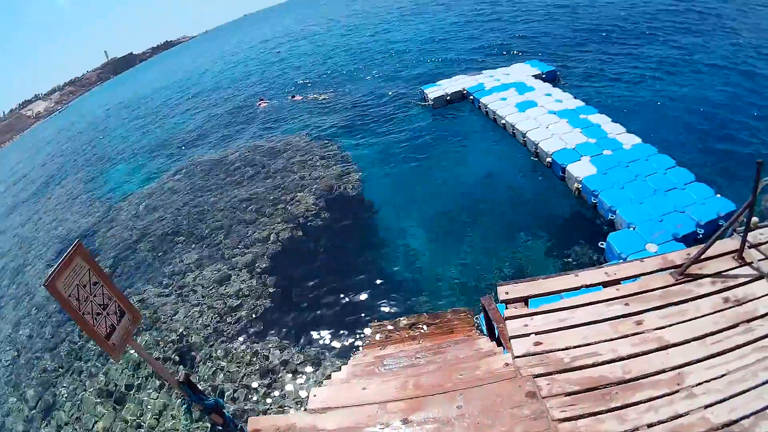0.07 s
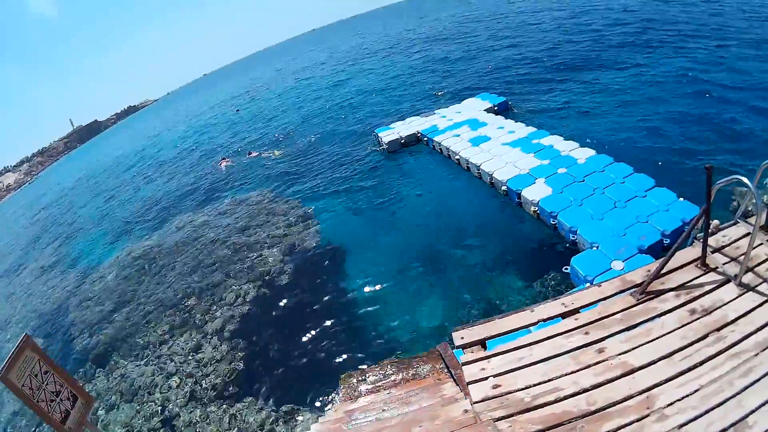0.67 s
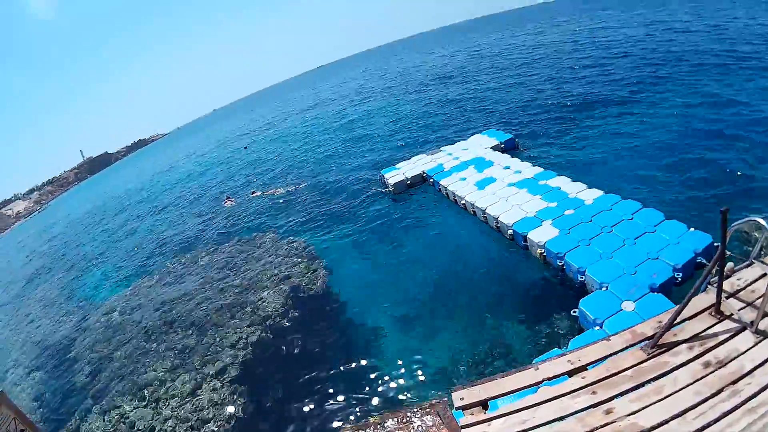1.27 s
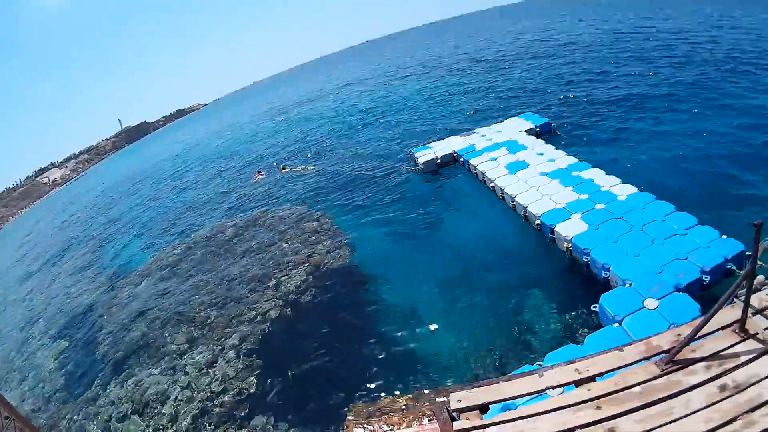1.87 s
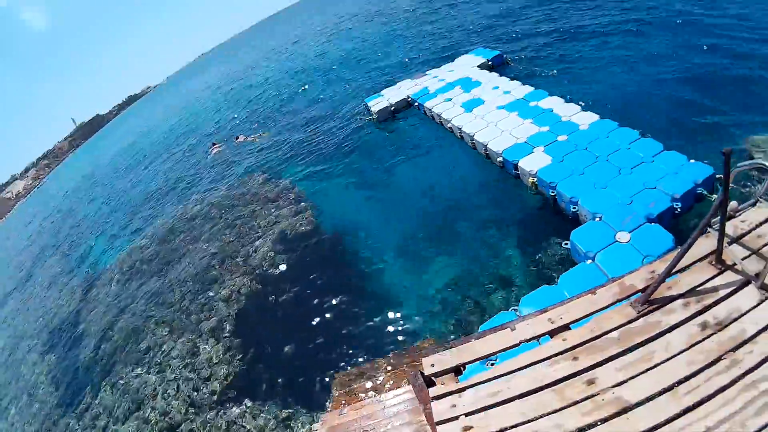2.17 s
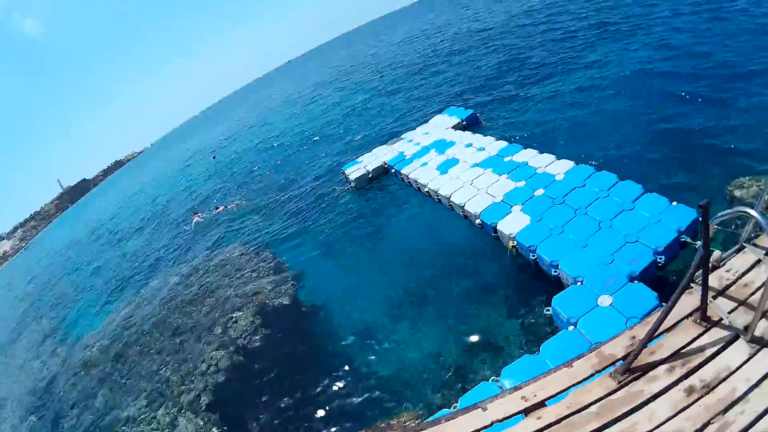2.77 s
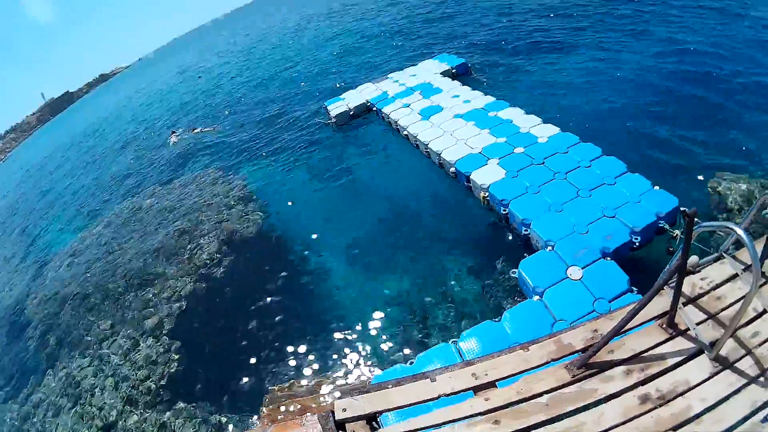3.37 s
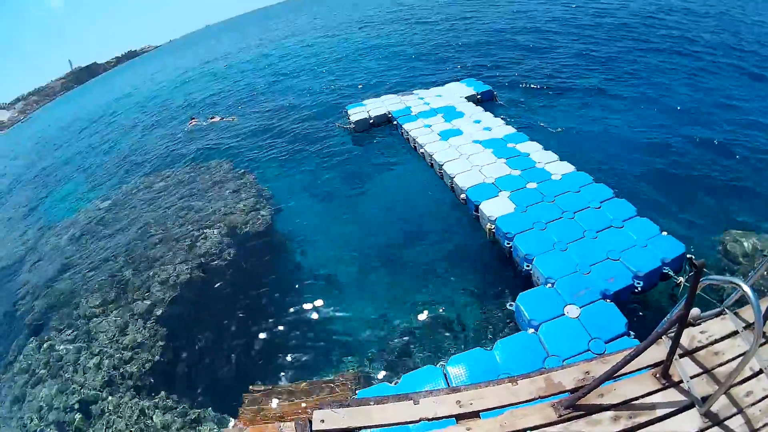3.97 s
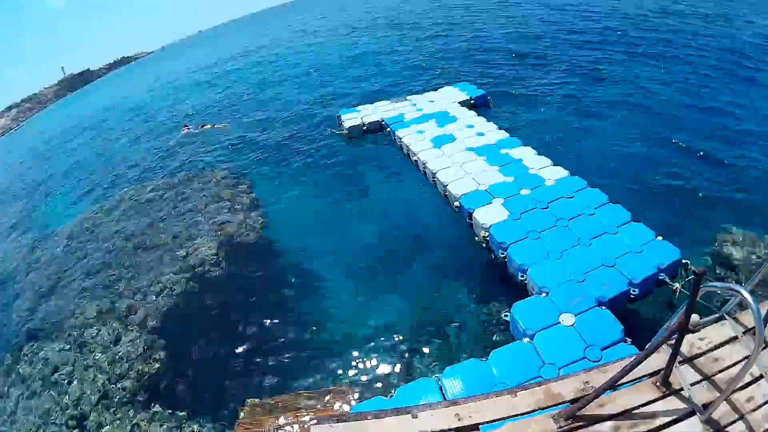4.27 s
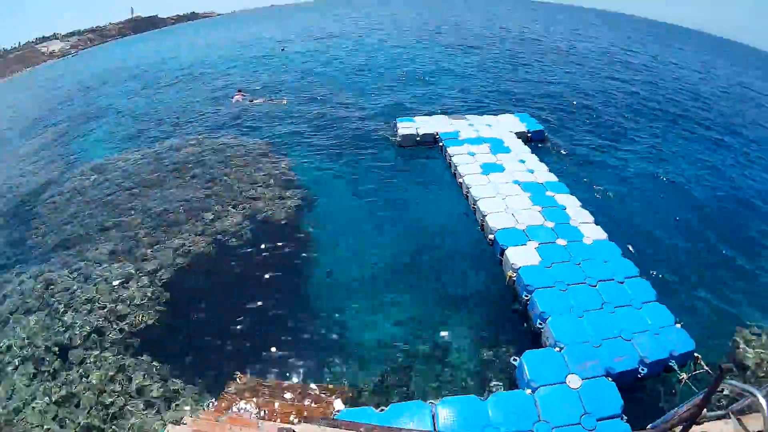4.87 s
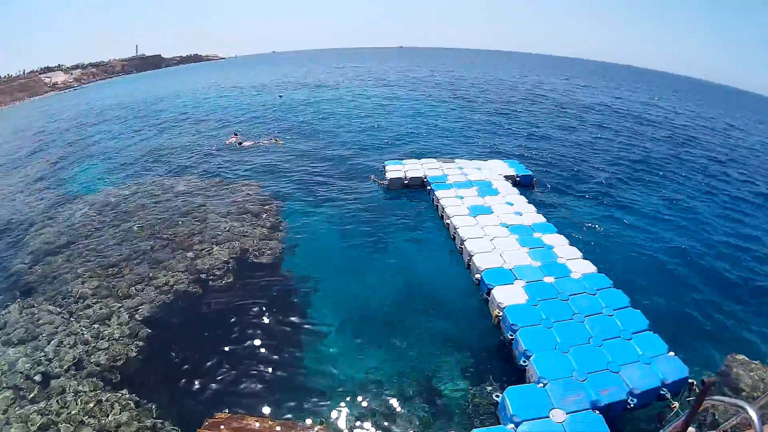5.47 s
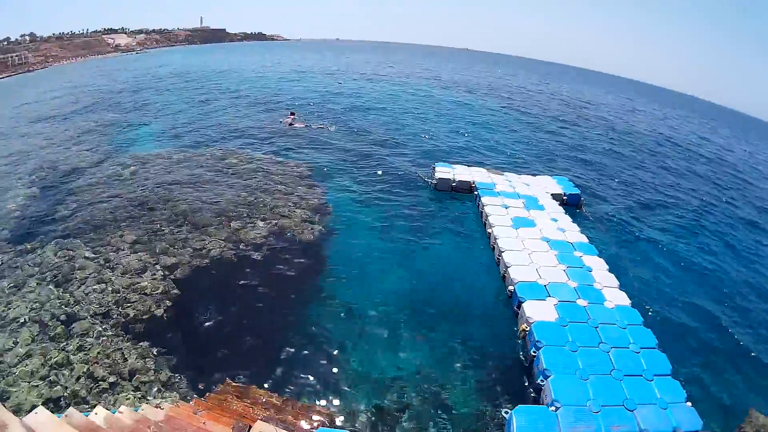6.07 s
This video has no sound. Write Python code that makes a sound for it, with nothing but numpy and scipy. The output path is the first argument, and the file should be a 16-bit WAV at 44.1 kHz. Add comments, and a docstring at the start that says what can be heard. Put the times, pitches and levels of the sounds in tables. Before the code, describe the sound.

Everything is heard from inside a closed plastic case carried along a wooden jetty. A hand rubs on the shell right at the microphone in short groans and hissing strokes, over a faint, muffled sea wash and thin hiss. Soft, dull footfalls land in the first second. Louder clusters of thuds, hollow booms and plastic clacks come at about 1.4 and 1.9 seconds, with a little ringing from the mount. The heaviest step hits at 2.3 seconds with a short, bright ring, followed by a thin rising squeak and a few tiny ticks. Lighter bumps come around 3.2 and 4.3 seconds, with the hand sliding between them. A board gives three faint, low creaks from 4.5 to 4.7 seconds. Another run of hollow knocks lands just after 5 seconds, then hissing rubs and small taps continue until about 6 seconds.

```python
"""A hand rubs on plastic, right at the microphone, and a footfall thuds up from below: someone shuffles
along the planks of a seaside jetty, carrying a small camera in a closed case. Each step or bump comes
through as a low thud, a hollow boom and a clack of the shell; a few jolts set the mount ringing.
The grip shifts in short groans, slides in hissing strokes and squeaks once; later a board creaks.
The sea outside is only a muffled wash under the microphone's hiss."""
import sys
import numpy as np
from scipy import signal
from scipy.fft import rfft, irfft
from scipy.io import wavfile
from scipy.ndimage import uniform_filter1d

SR = 44100
rng = np.random.default_rng(int(sys.argv[2]) if len(sys.argv) > 2 else 0)


def materialize(psi):
    """Save the field psi as 16-bit PCM at rate SR to the path in sys.argv[1].

    A 1-D psi becomes a single channel; in a 2-D psi each row is a channel.
    """
    bounded = np.clip(np.atleast_2d(psi).T, -1, 1)
    quanta = np.round(bounded * 32767).astype(np.int16)
    wavfile.write(sys.argv[1], SR, quanta)


N = 269892
TIME = np.arange(N) / SR

# What rings under and around the microphone. Each row: pitch in Hz, level in dB, nominal t60 in seconds.
THUD_MODES = [(74.3, -0.5, 0.053), (115.6, -4.5, 0.051), (183, -6.5, 0.04)]  # planks and body under a step
HOLLOW_MODES = [(235, -6, 0.035), (328.4, 1.5, 0.05), (421.7, -3, 0.021), (490, -13, 0.082),
                (785, -28, 0.088)]  # air and walls of the case
SHELL_MODES = [(1028, -3, 0.017), (1296, 0, 0.023), (1510, 0, 0.022), (1680, -0.5, 0.017),
               (2170, -1.5, 0.0043), (3157, -12.5, 0.015), (3840, -17.5, 0.024)]  # the stiff plastic shell
GRIT_MODES = [(2310, 6.5, 0.0099), (2893, -6, 0.034), (3210, 0.5, 0.0087), (4056, -8, 0.015),
              (4630, -11, 0.011), (5620, -9.5, 0.0072), (6250, -13, 0.0062)]  # the shell's highest modes, reached by fine grit
# Faint rustle of the resting grip. Each row: time in seconds, level in dB.
RESTING_RUSTLE = [(0, -57), (.45, -71), (1.2, -74.5), (1.55, -65.5), (2.2, -52.5), (2.8, -58.5),
                  (3.1, -64.5), (3.3, -51.5), (3.8, -73), (4.03, -61), (4.45, -57), (5.5, -64.5),
                  (6.12, -59.5)]


def undb(db):
    """Decibels to gain."""
    return 10 ** (np.asarray(db) / 20)


def unit(x):
    """Scale to rms 1."""
    return x / np.sqrt(np.mean(x ** 2))


def butter(x, hz, kind, order=2):
    """Causal low-pass or high-pass."""
    return signal.sosfilt(signal.butter(order, min(hz, .45 * SR), kind, fs=SR, output="sos"), x)


def coloured(points):
    """Noise of rms 1 with a (Hz, dB) spectrum."""
    hz, db = np.transpose(points)
    bin_hz = np.arange(N // 2 + 1) * SR / N
    gain = undb(np.interp(np.log(bin_hz + 1), np.log(hz), db))
    return unit(irfft(rfft(rng.standard_normal(N)) * gain, N))


def walk(rate):
    """Glide between random levels, rate of them a second; rms 1."""
    hold = int(SR / rate)
    levels = np.repeat(rng.standard_normal(N // hold + 1), hold)
    return unit(uniform_filter1d(levels, hold)[:N])


def ring(modes, detune=0., damping=1.):
    """Response of a set of modes to one tap; neighbouring modes swing in opposite directions."""
    t = TIME[:SR // 4]
    out = 0
    for k, (hz, db, t60) in enumerate(modes):
        hz = hz * (1 + detune * rng.standard_normal())
        decay = np.exp(-np.log(1000) * t * damping / t60)
        out = out + (-1) ** k * undb(db) * np.sin(2 * np.pi * hz * t) * decay
    return out


def add(out, s, sound, db):
    """Mix a sound in at time s, its envelope peaking at db."""
    i = max(int(s * SR), 0)
    part = sound[:max(N - i, 0)] * undb(db) / np.abs(signal.hilbert(sound)).max()
    out[i:i + len(part)] += part


def slips(modes, rate, spread_db, patchy_db, patchy_rate):
    """Tiny stick-slip releases of uneven size, coming in bunches, ring a set of modes."""
    sizes = undb(spread_db * rng.standard_normal(N)) * rng.choice([-1, 1], N)
    clicks = (rng.random(N) < rate / SR) * sizes
    sound = signal.fftconvolve(clicks, ring(modes))[:N]
    # the load sets the mean friction over a tenth of a second; only the detail is chance
    sound = sound / np.sqrt(uniform_filter1d(sound ** 2, SR // 10) + 1e-12)
    return unit(sound * undb(patchy_db * walk(patchy_rate)))


def resting_grip(rumble_db=5, grit_db=-22):
    """The holding hand is never quite still: power over time of rumble, groan, hiss and grit."""
    hiss = undb(np.interp(TIME, *np.transpose(RESTING_RUSTLE)))
    return np.outer(undb([rumble_db, 0, 0, grit_db]), hiss) ** 2


def grip_shifts(depth_db=23, rise_share=0.52, firm_db=-45.5, grit_db=-20):
    """The grip shifts as the body's weight moves: power over time of rumble, groan, hiss and grit."""
    # Each row: peak time in seconds, length in seconds, hiss in dB, groan over hiss in dB.
    shifts = [(0, 0.29, -46, -1), (0.266, 0.14, -57.5, -2), (0.662, 0.25, -69.5, 12.5),
              (0.976, 0.06, -49.5, 2), (1.294, 0.1, -43, 5), (1.424, 0.19, -40, 12), (1.457, 0.13, -37, 3),
              (1.583, 0.21, -51, 5.5), (1.815, 0.14, -52.5, 16), (1.886, .1, -48, 12),
              (1.925, 0.19, -32, 10.5), (1.985, .12, -45, -9), (2.088, 0.29, -37.5, -3.5),
              (2.892, 0.16, -43.5, -3), (3.04, 0.1, -46.5, -12), (3.357, 0.28, -43.5, -11),
              (3.478, 0.12, -44, 7.5), (3.596, 0.087, -37, -18), (3.785, 0.29, -43.5, 2),
              (3.891, 0.28, -49.5, -1), (4.899, .18, -45.5, -4), (5.116, 0.54, -40, -2.5),
              (5.574, 0.093, -56.5, 9), (5.791, 0.22, -43, -2), (5.995, 0.039, -50.5, 3)]
    power = np.zeros((4, N))
    for peak, length, db, groan_db in shifts:
        near = np.abs(TIME - peak) < 2 * length
        since = TIME[near] - peak
        away = np.maximum(-since / rise_share, since / (1 - rise_share)) / length
        hiss = undb(db - depth_db * away)
        rumble_db = 5 + 0.66 * (firm_db - db)  # gentle shifts are mostly slow rumble
        power[:, near] += np.outer(undb([rumble_db, groan_db, 0, grit_db]), hiss) ** 2
    return power


def hand_slides(rumble_db=-7.5, groan_db=-6.5, brighten_db=1.5):
    """Long strokes of the hand over the case: power over time of rumble, groan, hiss and grit."""
    # Each row: start, end, attack and release in seconds (each fade spans 20 dB), then in dB the hiss,
    # its swell along the stroke, and the grit over the hiss before dulling.
    slides = [(2.327, 2.456, 0.045, 0.031, -40, -4, -10), (2.506, 2.666, .008, .12, -46, 2, -7),
              (3.434, 3.62, 0.29, 0.27, -42, 3.5, -4), (3.74, 3.779, .13, .02, -40, 0.5, 1),
              (5.257, 5.429, 0.19, 0.12, -37.5, -5.5, -4.5), (5.695, 5.751, 0.12, 0.019, -34, 0, -7.5)]
    power = np.zeros((4, N))
    for start, end, attack, release, db, swell_db, grit_db in slides:
        along = np.clip((TIME - start) / (end - start), 0, 1)
        fade = np.clip(np.maximum((start - TIME) / attack, (TIME - end) / release), 0, 10)
        hiss = undb(db + swell_db * (along - .5) - 20 * fade)
        dulling_db = brighten_db * (2 - along)  # eases as the hand gathers speed
        power[:3] += np.outer(undb([rumble_db, groan_db, 0]), hiss) ** 2
        power[3] += (hiss * undb(grit_db - dulling_db)) ** 2
    return power


def rubbing(grit_trim_db=-2.5, sway_db=-7):
    """Skin on the case, up close: slow slips shake it, quicker ones groan, the finest hiss in the shell."""
    rumble_gain, groan_gain, hiss_gain, grit_gain = np.sqrt(resting_grip() + grip_shifts() + hand_slides())
    rumble = slips(THUD_MODES, rate=600, spread_db=1.5, patchy_db=2.5, patchy_rate=25)
    rumble = unit(butter(rumble, 188, "low", order=3))
    # the carrying arm sways below the lowest mode
    sway = undb(sway_db) * coloured([(15, -12), (36, 6), (60, -20), (200, -60), (2000, -89)])
    groan = slips(HOLLOW_MODES, rate=890, spread_db=2.5, patchy_db=3.0, patchy_rate=45)
    groan = butter(groan, 1100, "low")
    hiss = slips(SHELL_MODES, rate=4500, spread_db=3, patchy_db=2.05, patchy_rate=77)
    hiss = butter(butter(hiss, 2730, "low"), 510, "high")
    grit = slips(GRIT_MODES, rate=7000, spread_db=2.5, patchy_db=1.5, patchy_rate=90)
    grit = butter(grit, 7700, "low", order=4)
    return (unit(rumble + sway) * rumble_gain + unit(groan) * groan_gain
            + unit(hiss) * hiss_gain + unit(grit) * grit_gain * undb(grit_trim_db))


def sea(level_db=-55, swell_db=2, swells_per_s=2.96):
    """Water and wind around the jetty, dulled by the closed case."""
    # The wash as heard inside. Each row: frequency in Hz, relative spectral level in dB.
    wash_spectrum = [(20, 3), (45, -2.5), (90, -6), (160, -13), (260, -9), (325, -25), (420, -22),
                     (650, -19.5), (1400, -35), (2500, -52), (6000, -78)]
    return coloured(wash_spectrum) * undb(level_db + swell_db * walk(swells_per_s))


def stray_bumps(count=16, over_rustle_db=(14, 10, 10), scatter_db=2.5, hardness_hz=1500):
    """Faint bumps that follow the restlessness of the grip, as extra rows for knocks()."""
    times = (np.arange(count) + rng.random(count)) / count * TIME[-1]
    rustle_db = np.interp(times, *np.transpose(RESTING_RUSTLE))
    levels = rustle_db[:, None] + np.array(over_rustle_db) + scatter_db * rng.standard_normal((count, 3))
    return np.column_stack([times, levels, np.full(count, hardness_hz)])


def knocks(boom_trim_db=-2.5, chatter_db=-24, chatter_s=0.0064, rebound_s=0.0107, lead_s=.001):
    """Steps and bumps heard through the case; each lands on a new spot, so the modes shift a little."""
    # Each row: start in seconds, thud, untrimmed boom and clack in dB, contact hardness as a cutoff in Hz.
    blows = [(0.02, -27.5, -44.5, -43, 2300), (0.0602, -40, -46, -30, 3700), (0.364, -30, -37, -37.5, 2400),
             (0.9805, -27.5, -29.5, -34, 2180), (1.161, -48, -41.5, -51.5, 2200),
             (1.273, -33, -42, -36.5, 2400), (1.342, -40, -16, -6.5, 1210),
             (1.3812, -28, -21.5, -27.5, 1300), (1.4018, -17, -34, -37, 2600), (1.418, -27, -16, -29, 1700),
             (1.432, -29, -16.5, -34, 2000), (1.558, -27.5, -41.5, -36, 2450),
             (1.72, -28.5, -66, -49, 2400), (1.8388, -23.5, -15.5, -32.5, 4700),
             (1.8645, -21.5, -13.5, -26.5, 2600), (1.912, -31, -21.5, -32, 2110),
             (1.921, -39, -11.5, -39, 2700), (2.0813, -42, -40, -20.5, 1400),
             (2.099, -43, -19.5, -22.5, 1420), (2.3135, -13.5, -30, -17, 3180),
             (2.3165, -30, -33, -21, 3000), (2.3234, -23, -14.5, -19.5, 2600),
             (2.329, -16.5, -26, -40, 2500), (2.336, -17, -19.5, -38, 2400), (2.357, -44, -22, -25, 1720),
             (2.417, -19, -54, -48, 2400), (2.646, -39, -51, -27.5, 1900), (2.68, -41, -52, -30.5, 2200),
             (3.1762, -27.5, -25.5, -17.5, 1660), (3.2497, -36, -30, -33, 1800),
             (3.298, -23.5, -29, -44, 2400), (4.0727, -58, -40, -45.5, 2000),
             (4.2746, -32.5, -27, -33, 1200), (4.7457, -39, -31.5, -40.5, 2370),
             (4.7767, -37, -28, -37.5, 2100), (5.0017, -31, -23.5, -19, 2260),
             (5.0334, -28.5, -27.5, -29.5, 1600), (5.07, -40, -23, -24, 3900),
             (5.0871, -38, -20.5, -18, 1400), (5.11, -20, -15.5, -31, 1700), (5.1346, -25, -18, -10, 1860),
             (5.772, -38, -63, -28.5, 1700), (5.795, -41, -34.5, -33.5, 1900)]
    out = np.zeros(N)
    t = TIME[:SR // 4] - 20 * lead_s
    impact = np.argmin(np.abs(t))
    # surfaces graze just before they meet, and loose parts chatter on afterwards
    graze = np.exp(np.where(t < 0, t / (2 * lead_s), -t / chatter_s))
    for s, thud_db, boom_db, clack_db, hardness_hz in np.vstack([blows, stray_bumps()]):
        # a slow push that hardly wakes the hollow modes also gives a deeper, rounder thud
        push_hz = 430 * np.clip(undb((boom_db - thud_db) / 2), .25, 1.2)
        planks = butter(ring(THUD_MODES, detune=0.046), push_hz, "low")
        hollow = butter(ring(HOLLOW_MODES, detune=0.019, damping=0.99), 930, "low")
        add(out, s - 2 * lead_s, planks, thud_db)
        add(out, s - lead_s, hollow, boom_db + boom_trim_db)
        # the case drops back into the hand after the clack
        add(out, s + rebound_s, planks, clack_db - 21.5)
        add(out, s + rebound_s, hollow, clack_db - 20)
        contact = undb(chatter_db) * rng.standard_normal(len(t)) * graze / 2
        contact[impact] += 1
        shell = signal.fftconvolve(contact, ring(SHELL_MODES, detune=0.017, damping=0.9))[:len(t)]
        shell = butter(shell, hardness_hz, "low")  # soft contacts lose their treble
        shell = butter(shell, min(0.4 * hardness_hz, 900), "high")
        add(out, s + t[0] - lead_s / 2, shell, clack_db)
        # harder contacts put more into the highest modes
        edge = butter(ring(GRIT_MODES, detune=0.014), 5000, "low", order=4)
        add(out, s, edge, clack_db - 25 + 5 * np.log2(hardness_hz / 2000))
    return out


def ticks(t60_s=0.0034):
    """Pin-point contacts on the case, each a few cycles of one high mode."""
    # Each row: start in seconds, level in dB, pitch in Hz.
    contacts = [(0.0579, -37, 3680), (0.4124, -36, 1710), (.4120, -47, 4340), (2.448, -37, 4000),
                (2.462, -30, 4800), (2.502, -39, 1560)]
    out = np.zeros(N)
    for s, db, hz in contacts:
        add(out, s, butter(ring([(hz, 0, t60_s)]), 0.66 * hz, "low"), db)
    return out


def mount_ring():
    """Jolts set the camera's mount ringing, right beside the microphone."""
    # Each row: start in seconds, level in dB.
    jolts = [(1.342, -40), (1.459, -24.5), (2.081, -26), (2.313, -11)]
    # Each row: pitch in Hz, level in dB, t60 in seconds.
    mount_modes = [(498, 0, 0.086), (771, 0.5, 0.13), (1490, -2.5, 0.11), (1674, 1.5, .12),
                   (1934, 5.5, 0.025), (2120, -12, 0.12), (2196, -4.5, 0.057), (3160, -19, 0.1)]
    out = np.zeros(N)
    for s, db in jolts:
        add(out, s, butter(ring(mount_modes, detune=0.0032), 3900, "low"), db)
    return out


def squeak(start_s=2.34, end_s=2.448, first_hz=2130, last_hz=2700, level_db=-46, rough_db=3):
    """Skin catches on the plastic as the heaviest step settles: a thin tone, rising as the grip tightens."""
    along = np.clip((TIME - start_s) / (end_s - start_s), 0, 1)
    jitter = 1 + .05 * walk(600)
    hz = (first_hz + (last_hz - first_hz) * along ** 3) * jitter
    gate = uniform_filter1d(1. * ((TIME > start_s) & (TIME < end_s)), SR // 100)
    return np.sin(2 * np.pi * np.cumsum(hz) / SR) * gate * undb(level_db + rough_db * walk(200))


def creaks():
    """Underfoot, a loaded board gives three short, low creaks."""
    # Each row: start in seconds, end in seconds, level in dB.
    creak_spans = [(4.475, 4.537, -48.5), (4.54, 4.643, -50.5), (4.661, 4.703, -47)]
    # The flexing board. Each row: pitch in Hz, level in dB, t60 in seconds.
    board_modes = [(139, -5, 0.044), (198, 4, 0.034), (260, 6, 0.02)]
    gate = sum(undb(db) * ((TIME > start) & (TIME < end)) for start, end, db in creak_spans)
    groan = slips(board_modes, rate=290, spread_db=3, patchy_db=-0.5, patchy_rate=62)
    return unit(butter(groan, 400, "low")) * uniform_filter1d(gate, SR // 200)


def scene():
    """The jetty from inside the carried case, in one channel."""
    return (rubbing() + sea() + knocks() + ticks() + mount_ring() + squeak() + creaks())[None]


def record(dry, hiss_db=-64, whine_db=-84, quiet_drop_db=5.5, open_db=-42, top_hz=15600):
    """The microphone adds hiss and a thin whine; a mild suppressor lowers both while little else sounds."""
    # The microphone's own hiss. Each row: frequency in Hz, relative spectral level in dB.
    hiss_spectrum = [(100, -10), (1000, 2.5), (3000, 3), (6000, 1), (9000, 0.5), (12000, -0.5), (14800, 0),
                     (15700, -24)]
    loudness = np.sqrt(uniform_filter1d(dry[0] ** 2, SR // 8, origin=SR // 24) + 1e-12)
    closed = 1 / (1 + (loudness / undb(open_db)) ** 2)
    whine_hz = 9535 + 30 * walk(44)
    whine = np.sqrt(2) * np.sin(2 * np.pi * np.cumsum(whine_hz) / SR)
    noise = coloured(hiss_spectrum) * undb(hiss_db) + whine * undb(whine_db)
    mix = butter(dry, 15, "high", order=1) + noise * undb(-quiet_drop_db * closed)
    return signal.sosfilt(signal.ellip(10, .2, 70, top_hz, fs=SR, output="sos"), mix)


dry = scene()
out = record(dry)
materialize(out)
```